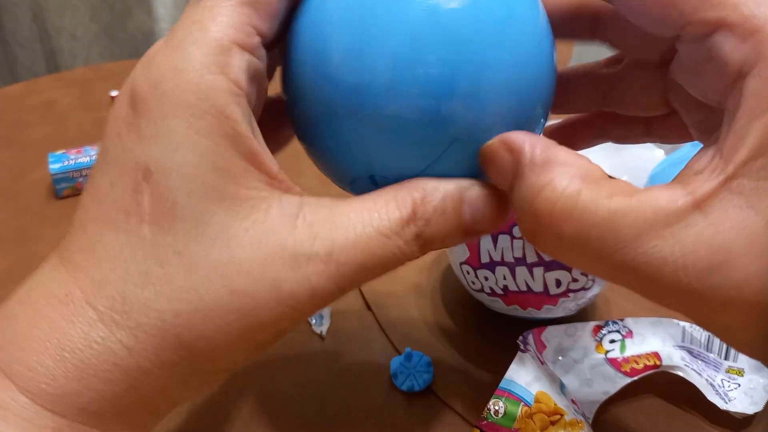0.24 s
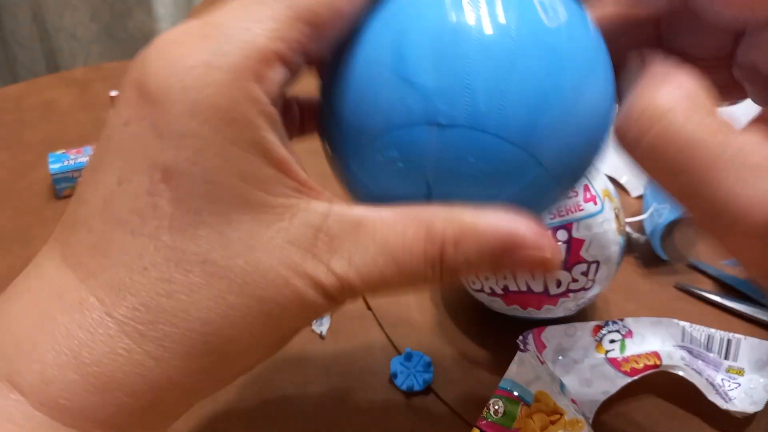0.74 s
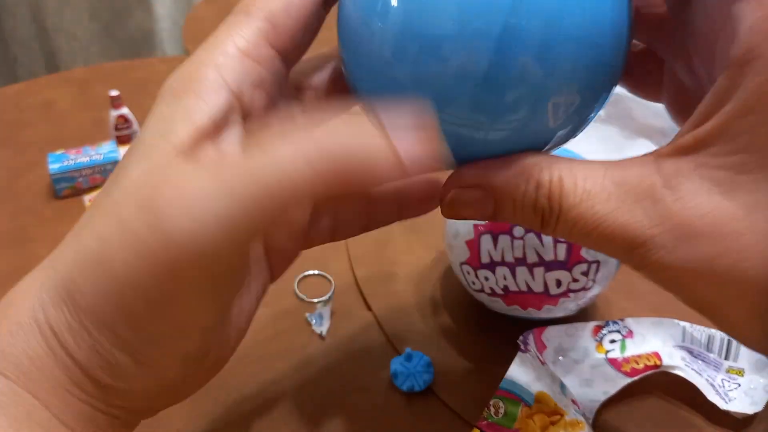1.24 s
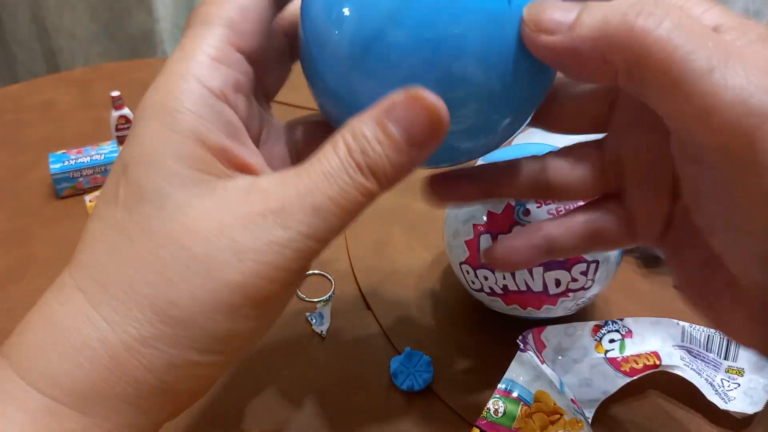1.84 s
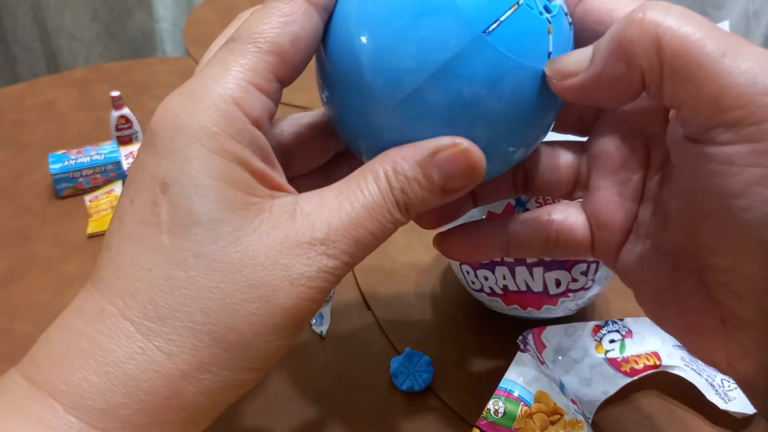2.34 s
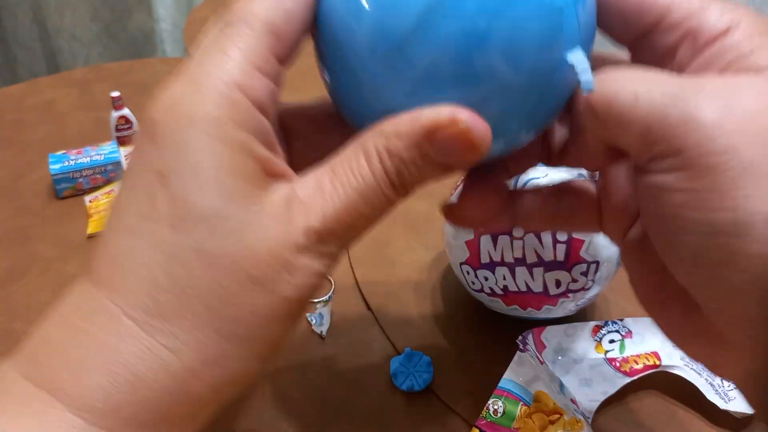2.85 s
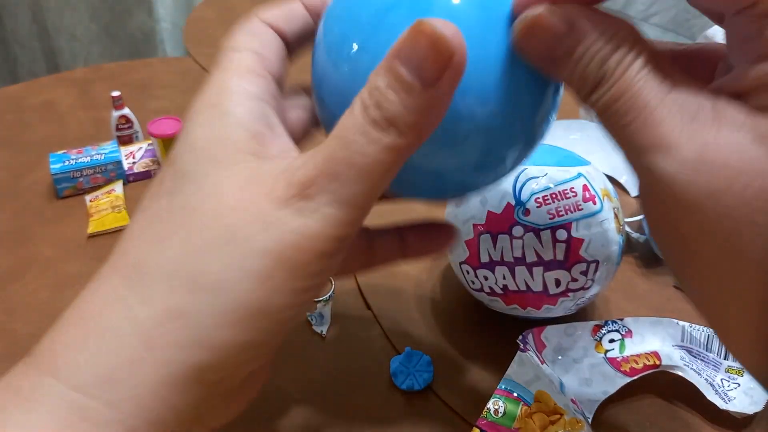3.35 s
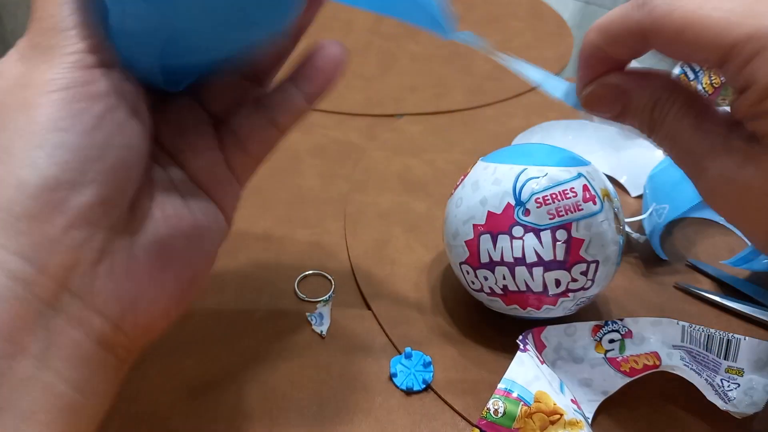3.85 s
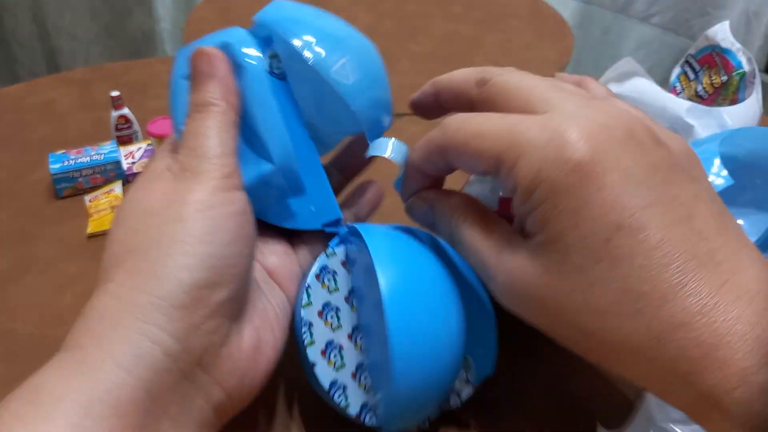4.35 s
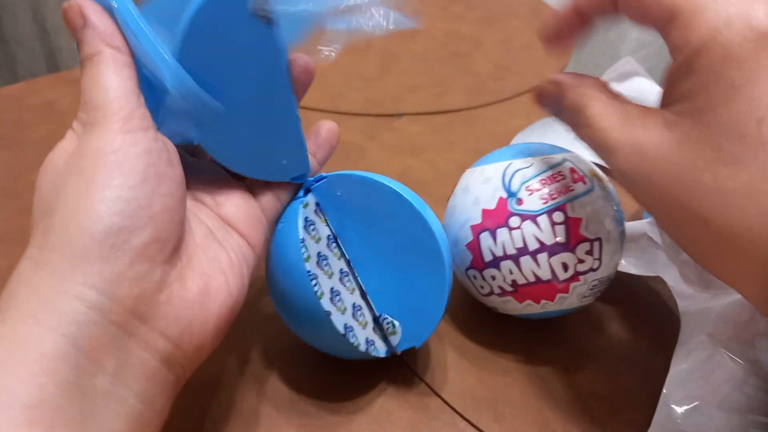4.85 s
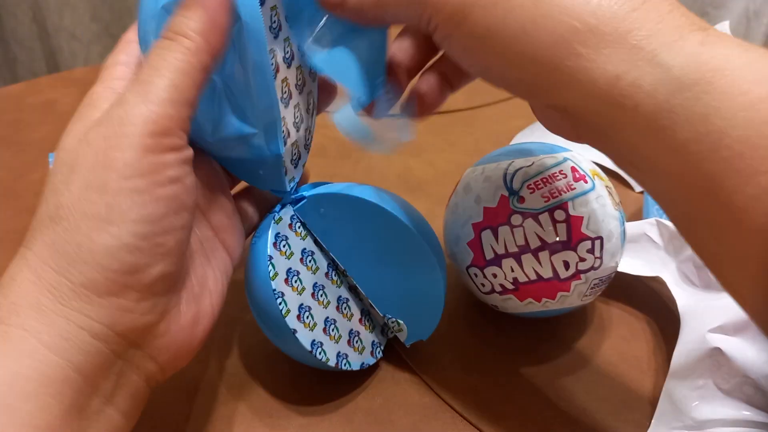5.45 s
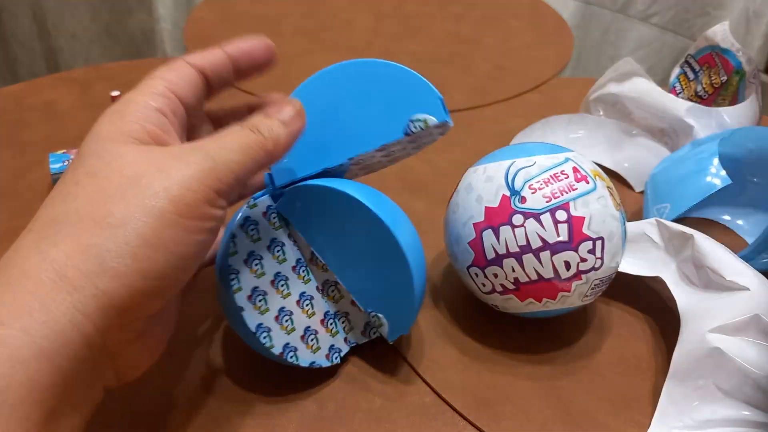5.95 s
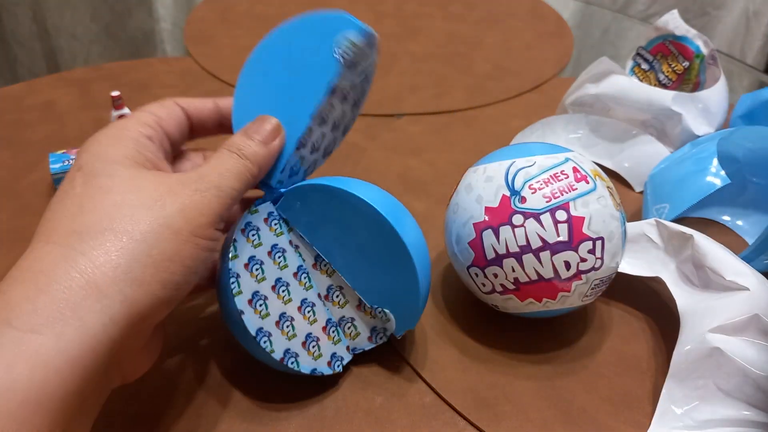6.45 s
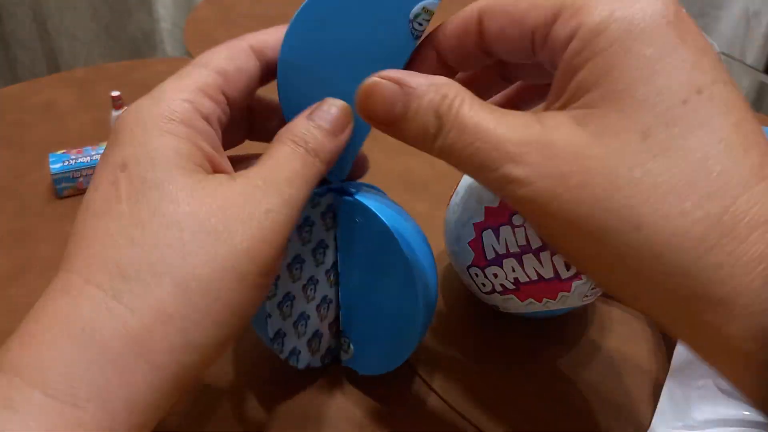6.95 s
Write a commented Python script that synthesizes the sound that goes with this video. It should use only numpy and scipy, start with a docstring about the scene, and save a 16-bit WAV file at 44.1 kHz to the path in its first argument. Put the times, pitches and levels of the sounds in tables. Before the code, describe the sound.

In a small room with a low appliance hum, hands close to two spaced microphones pick at a plastic capsule's tight film: sharp snaps, dull bumps and small rustles with pauses. A perforated strip rips quickly, its pitch sinking. Then hollow segments clatter apart in a dense burst, followed by rubbing, film crinkling and scattered light knocks.

```python
"""A small room, an appliance humming close by, hands near two spaced microphones: bass alike, treble unrelated.
First fingers pick at a plastic capsule's shrink film: noise-burst snaps, rustles and a few knocks.
From about 3.5 s the perforated strip tears: uneven cracks with a sinking band of noise, the hum low beneath.
Then the hollow segments fall open, knock (short decaying sines) and rub (resonant noise); the film crinkles
on the table to the end. The hum, steady sines with room air, follows a set level and dips briefly at set times."""
import sys
import numpy as np
from scipy import signal
from scipy.fft import rfft, irfft, next_fast_len
from scipy.io import wavfile
from scipy.ndimage import uniform_filter1d, map_coordinates

SR = 44100
rng = np.random.default_rng(int(sys.argv[2]) if len(sys.argv) > 2 else 0)


def waveform_to_disk(signal):
    """Save audio, clipped to [-1, 1], as 16-bit WAV at the path in sys.argv[1]."""
    frames = np.transpose(np.atleast_2d(signal))
    scaled = np.clip(frames, -1, 1) * 32767
    samples = np.round(scaled).astype(np.int16)
    wavfile.write(sys.argv[1], SR, samples)


def ratio(d):
    """dB to gain"""
    e = np.asarray(d, float) / 20
    return 10 ** e


N = 317961
CLOCK = np.arange(N) / SR  # time of each sample, s

# All levels are relative: each source adds its own trim. Spectra are shapes, in dB per Hz.
# snaps of film and plastic: start_s, level_db, top_octave_db (over the level), length_ms
SNAP_EVENTS = [(.142, -32.5, 2.5, 3.761), (.294, -32, -5, 5.16), (.325, -24, 0, 10.535),
               (.487, -13.5, -13, 2.883), (.542, -7.5, -15.5, 6.293), (.583, -25, -14, 3.94),
               (.668, -18.5, -13, 3.66), (0.68, -12, -7.5, 3.891), (.73, -3, -19, 3),
               (.761, -12.5, -19, 4.62), (.895, -31.5, -5.5, 5.095), (.921, -26, -4, 3.78),
               (0.951, -17, -32, 10.93), (.971, -20, -27.5, 3.38), (1.014, -6.5, -16.5, 6.354),
               (1.029, -10, -12.5, 2.357), (1.044, -26, -13, 3.68), (1.094, -32.5, -18, 5.51),
               (1.186, -33, -33, 4.655), (1.435, -37, 0, 3), (1.483, -18.5, -25.5, 8.31),
               (1.626, -34.5, -4, 5.44), (1.801, -25, -33, 4.924), (2.06, -31, -5, 2.417),
               (2.297, -9, -10, 3.717), (2.566, -7.5, -14.5, 5.575), (2.678, -24, -16.5, 4),
               (2.69, -30, -20, 4), (2.791, -27.5, -11, 4.737), (2.815, -34, -5, 4),
               (2.828, -19, -2.5, 9.603), (2.877, -21, -23, 3.67), (2.938, -20, -8.5, 4.4),
               (2.963, -21, -24.5, 5), (2.985, -23, -25.5, 3.2), (3.016, -19, -21, 3),
               (3.032, -11.5, -15, 3.599), (3.162, -32, -13.5, 7.916), (3.238, -23, -7.5, 6.73),
               (3.384, -30, -20, 6.247), (3.408, -26, -28, 3.9), (3.449, -15.5, -0.5, 2.816),
               (3.468, -12, -2, 2.75), (3.473, -17.5, 1, 3.598), (3.496, -14, -8, 3.62),
               (3.503, -10, -3.5, 2.636), (3.508, -14.5, -8, 5.543), (3.525, -11.5, -8, 4.12),
               (3.54, -13.5, -9.5, 7.07), (3.55, -15, -3, 5.14), (3.801, -15, 0.5, 2.599),
               (3.837, -18, -14.5, 9.244), (3.847, -7.5, -8.5, 2.881), (3.865, -16.5, -5.5, 3.76),
               (3.904, -16.5, -11.5, 5.81), (3.92, -10.5, -21.5, 4.342), (3.937, -16, -10.5, 5.14),
               (3.962, -9.5, -9, 4.319), (4.089, -19, -17.5, 7.83), (4.115, -15, -17.5, 4.933),
               (4.133, -12.5, -20, 9.35), (4.163, -14.5, -14.5, 5.72), (4.171, -11.5, -16, 2.774),
               (4.197, -10, -12, 7.848), (4.211, -11.5, -19, 3.493), (4.243, -19.5, -12, 5.54),
               (4.272, -23.5, -6, 2.976), (4.286, -19.5, -8, 4.155), (4.294, -17.5, -10, 6.08),
               (4.304, -15, -24.5, 9.13), (4.347, -12, -18, 5.558), (4.408, -20.5, -12, 7.154),
               (4.728, -32.5, -12, 4.556), (4.885, -22, -11, 5.7), (4.913, -22.5, -20.5, 5.964),
               (4.932, -20, -9, 4.06), (4.949, -13.5, -11, 3.666), (5.014, -24, -15, 6.32),
               (5.214, -27, -9, 5), (5.324, -27, -3, 5.3), (5.357, -19.5, -10.5, 6),
               (5.417, -20.5, -11.5, 3.967), (5.439, -14, -8.5, 4.31), (5.454, -13.5, -7.5, 7.265),
               (5.466, -18, -2.5, 9), (5.475, -18, -5.5, 5.313), (5.56, -11, -15.5, 10.53),
               (5.584, -15, -16, 3.94), (5.599, -13, -6, 5.11), (5.615, -12, -22, 5.207),
               (5.64, -18, -7.5, 5.954), (5.685, -20.5, -9.5, 5.626), (5.761, -13, -20, 5.483),
               (5.8617, -7, -10, 4.5), (6.111, -33.5, -10, 5.284), (6.159, -11, -25, 4),
               (6.437, -21.5, -25, 4.398), (6.594, -37.5, -3, 8), (6.702, -27, -11, 5.185),
               (6.743, -27.5, -10.5, 6.3), (6.794, -25.5, -13, 3.576), (6.879, -21, -15.5, 4.5),
               (7.008, -35, -6.5, 3.815)]
# body of a snap: freq_hz, density_db
SNAP_BODY_SPECTRUM = [(400, -29), (800, -17), (1500, -6), (3000, 2.5), (5000, 1.5), (7500, -2),
                      (10000, -13), (16000, -53.5)]
# top octave of a snap: freq_hz, density_db
SNAP_TOP_SPECTRUM = [(4000, -39.5), (7000, 4), (9000, 8.5), (13000, 9.5), (15800, 5), (15900, -23.5),
                     (17000, -33)]
# the strip tears hole by hole, the freed length sounds lower as it grows:
# time_s, rate_holes_per_s, level_db, strip_pitch_hz
TEAR_COURSE = [(3.556, 150, -17.5, 1300), (3.61, 120, -23, 1300), (3.648, 330, -25, 1220),
               (3.7, 275, -24, 900), (3.745, 290, -22.5, 500), (3.78, 400, -30, 300),
               (3.786, 400, -56.5, 300)]
# thin film under tension: freq_hz, density_db
TAUT_SPECTRUM = [(1500, -32.5), (2500, -11.5), (5000, -10.5), (7500, -3.5), (10000, -3.5), (14000, 1),
                 (15700, -5.5)]
# knocks on the hollow shell: start_s, level_db, shell_pitch_hz
KNOCK_EVENTS = [(.487, -23.5, 781.8), (.736, -17.5, 833.5), (.956, -20.5, 889), (0.97, -20.5, 738.5),
                (1.015, -15.5, 737.6), (1.029, -21, 650), (1.801, -30, 802.1), (2.297, -27, 750),
                (2.5645, -19, 1250), (2.879, -28, 900), (2.962, -27, 750), (3.847, -16, 2015),
                (3.896, -18.5, 1821), (3.915, -13, 1234), (3.95, -16, 932.9), (3.998, -24, 916.4),
                (4.074, -18, 1543), (4.105, -6.5, 1741), (4.116, -18, 1357), (4.133, -8.5, 968.9),
                (4.139, -6, 2068), (4.166, -12.5, 1704), (4.176, -6, 1749), (4.197, -10.5, 1129),
                (4.229, -16.5, 934.9), (4.237, -19.5, 828.8), (4.302, -7, 1062), (4.306, -7, 1062),
                (4.32, -8, 955.2), (4.349, -12.5, 896.7), (4.389, -14, 1006), (4.441, -23.5, 1063),
                (4.503, -22, 1007), (5.005, -23.5, 929.1), (5.352, -27, 1063), (5.44, -18, 1856),
                (5.456, -21, 1500), (5.562, -11.5, 1090), (5.583, -10, 1846), (5.615, -19, 1096),
                (5.651, -21, 2000), (5.706, -21, 1000), (5.72, -24, 950), (5.729, -19.5, 1025),
                (5.762, -3.5, 1010), (5.772, -17, 1050), (5.854, -22, 1103), (5.862, -19, 1400),
                (6.13, -25, 800), (6.16, -19, 1010), (6.189, -17, 741.3), (6.204, -20, 780),
                (6.219, -17, 747.9), (6.312, -22, 981.4), (6.4395, -13, 969.2), (6.441, -22, 2450),
                (6.53, -27, 1103), (6.599, -26, 1150), (6.704, -25, 900), (6.717, -23, 1200),
                (6.797, -23, 1010), (6.881, -16, 900), (6.91, -26, 1150), (7.009, -23.5, 987.9),
                (7.169, -18, 1007), (7.176, -18, 1000), (7.185, -14.5, 944.5)]
# modes of a knocked shell: multiple (of the pitch), level_db
KNOCK_MODES = [(1, 6), (.75, -3.5), (1.3, -6), (1.7, -7), (2.3, -4.5), (.5, -7.5)]
# soft bumps of palm and table: start_s, level_db, pitch_hz
BUMP_EVENTS = [(.586, -17, 330), (.7235, -12.5, 300), (0.7387, -12, 340), (.7744, -17, 320),
               (.959, -16, 330), (.975, -20, 330), (1.0175, -15, 330), (3.794, -24, 320),
               (3.803, -26, 95.33), (3.8395, -17, 423.8), (4.093, -20, 262.7), (4.3085, -20, 290),
               (4.9665, -22, 260), (5.373, -23, 350), (5.639, -26, 80), (5.764, -20, 287.6),
               (6.882, -16, 298.8)]
# rustles of the film: peak_s, level_db, rise_s and fall_s (per 20 dB), tautness_db (taut over slack)
RUSTLE_STROKES = [(0, -47, .01, .2, 10), (.15, -42, .07, .1, 4.5), (.333, -35, .06, .07, 7),
                  (.45, -46, .15, .15, 0.5), (.548, -39, .05, .1, 2.5), (.684, -34.5, .01, .25, 2),
                  (.738, -39, .05, .25, -15.5), (.9, -41, .07, .15, 2), (.956, -39.5, .03, .1, -4),
                  (1.02, -35.5, .015, .18, -5.5), (1.488, -42, .1, .11, -5.5), (2.06, -47, .15, .08, 1),
                  (2.303, -37.5, .01, .1455, 4), (2.572, -35, .008, .1046, 4.5),
                  (2.684, -45.5, .15, .08, -3), (2.833, -25, .008, .1024, 6), (2.89, -31, .07, .33, -1),
                  (3.243, -43, .016, .2, 4), (3.305, -44, .1, .08, 2), (3.453, -38, .01, .2, 8),
                  (3.505, -27.5, .0126, .2695, 9.5), (3.6, -27, .1, .1, 8), (3.667, -28, .1335, .2456, 4),
                  (3.79, -25, .1498, .04, 7.5), (3.87, -29, .1, .3, 0), (4.0, -36, .2, .2, -2.5),
                  (4.13, -32, .15, .2, -3), (4.24, -33, .2, .2, -2), (4.31, -33, .1, .1, -3),
                  (4.44, -38, .2, .06, -3), (4.84, -49, .2, .1, -5), (4.89, -32.5, .01, .059, -10),
                  (4.94, -32, .05, .17, -5), (5.18, -43, .1, .2, 5), (5.31, -43, .1, .15, 3),
                  (5.362, -36, .012, .12, 5), (5.468, -25, .05, .1349, 6), (5.565, -31, .0264, .1103, -4.5),
                  (5.63, -27, .0876, .13, -4), (5.767, -41, .01, .15, 0.5), (5.866, -28.5, .004, .19, -6),
                  (6.116, -47, .01, .15, -5.5), (6.168, -39.5, .03, .3, -0.5), (6.3, -46, .2, .3, 0),
                  (6.47, -47, .25, .2, 3), (6.715, -42, .013, .3, -3), (6.884, -44, .05, .06, 1.5),
                  (7.02, -46, .03, .2, 5), (7.16, -44, .05, .3, 4)]
# slack film: freq_hz, density_db
SLACK_SPECTRUM = [(900, -37), (1500, -21.5), (2200, -1), (4000, -2), (7000, -6.5), (10000, -10),
                  (15700, -27)]
# rubs on the shell: peak_s, level_db, rise_s and fall_s (per 20 dB), table_grumble_db (over the rub)
RUB_STROKES = [(.554, -43, .1676, .1311, -5), (.738, -34, .0912, .132, -2), (.963, -39.5, .0172, .1174, -2),
               (1.028, -36.5, .03, .17, -4), (2.86, -39, .03, .25, -9), (3.7, -37, .08, .3, -15),
               (3.85, -34, .05, .12, -8), (3.94, -30, .1, .15, -12), (4.04, -34, .15, .2, -12),
               (4.14, -24, .15, .15, -9), (4.21, -25, .2, .293, -7), (4.4, -32, .1715, .1, -8),
               (4.892, -33, .008, .1867, -5), (4.95, -29, .07, .1713, -2), (5.1, -41, .1, .35, -5),
               (5.22, -35, .015, .35, -2), (5.36, -30.5, .015, .17, -2), (5.45, -32, .0939, .2621, -8),
               (5.565, -30, .0379, .0814, -5), (5.617, -26, .0919, .18, -8),
               (5.72, -38.5, .1047, .0736, -5), (5.768, -38, .01, .3, -5), (6.121, -34, .02, .1964, -2),
               (6.19, -28, .0537, .2, -4), (6.37, -38, .1, .2, -5), (6.61, -44, .1, .3, -5),
               (6.72, -36, .03, .3, -5), (6.884, -37, .2, .15, -5), (7.019, -42, .05, .33, -5),
               (7.185, -27, .0472, .3, -5)]
# shell resonances under rubbing: center_hz, width_hz, level_db
SHELL_RESONANCES = [(454.39, 118.5, -6), (795.47, 132.5, -2), (1010, 220.8, -3.5), (1690.1, 376.87, -6.5),
                    (2300, 900, -17.5)]
# decay of the small room: freq_hz, t60_s
ROOM_DECAY = [(300, 0.5243), (2000, 0.2422), (8000, 0.222), (16000, 0.04317)]
# slow level of hum and room air: time_s, level_db
HUM_COURSE = [(0, -27), (1.2, -26.5), (2.8, -26), (2.95, -28.5), (3.54, -28), (3.6, -46.5), (3.97, -49.5),
              (4.08, -33), (4.4, -36.5), (5.0, -33.5), (5.34, -30), (5.65, -28.5), (5.78, -29),
              (5.9, -31.5), (6.16, -28), (7.21, -27)]
# brief dips of hum and room air: center_s, depth_db, half_width_s (to 1/e of the depth)
HUM_DIPS = [(.7, 9, 0.03647), (2.855, 17, 0.02389), (3.49, 9, 0.0399), (4.2, 7.5, 0.0806),
            (4.33, 19.5, 0.0278), (5.36, 10.5, 0.01107), (5.475, 13, 0.03987), (5.6, 17, 0.01159),
            (5.86, 4, 0.02516)]
# motor shaft orders: multiple (of the shaft rate), level_db (against the mains tone)
MOTOR_ORDERS = [(1, -28.5), (2, -13), (4, -16.5), (6, -20), (7, -30.5), (8, -19)]
# other appliance tones: freq_hz, level_db (against the mains tone)
APPLIANCE_TONES = [(91.2, -26), (169.9, -36), (519.8, -25)]
# room air: freq_hz, density_db
AIR_SPECTRUM = [(30, -41), (48, -29.5), (62, -16.5), (100, -6.5), (150, -8), (185, -14.5), (370, -14.5),
                (520, -20), (560, -25.5), (820, -29.5), (1200, -37.5), (3000, -42.5), (9000, -58),
                (12500, -53), (15700, -49)]
# likeness of the two spaced microphones: freq_hz, correlation (0 to 1)
MIC_LIKENESS = [(40, 0.4914), (130, 0.6564), (290, 0.8201), (640, 0.1608), (1400, 0), (3000, 0)]
# steep treble cutoff on the steadier sounds: freq_hz, gain_db
TREBLE_CUTOFF = [(15800, 0), (15900, -40)]


def unit(x):
    """Scaled to rms 1."""
    return x / np.sqrt(np.mean(x ** 2) + 1e-20)


def along(points, hz):
    """(Hz, value) points read on a log frequency axis."""
    f, v = np.transpose(points)
    return np.interp(np.log(hz + 1), np.log(f + 1), v)


def curves(rows):
    """One value per sample for each column after the time."""
    s, *cols = np.transpose(rows)
    return [np.interp(CLOCK, s, c) for c in cols]


def wobble(rate):
    """A smooth random curve, rate knots a second, knots of standard deviation 1."""
    knots = rng.standard_normal(int(N * rate / SR) + 4)
    return map_coordinates(knots, [np.arange(N) * rate / SR])


def filtered(x, response):
    """x through a complex response of frequency."""
    m = next_fast_len(N + 8192)
    return irfft(rfft(x, m) * response(np.fft.rfftfreq(m, 1 / SR)), m)[..., :N]


def colour(spectrum):
    """A gain response from (Hz, dB) points."""
    return lambda hz: ratio(along(spectrum, hz))


def noise(response):
    """Stereo noise of rms 1, as alike left and right as two spaced microphones make it."""
    def mid_side_response(hz):
        angle = np.arccos(np.clip(along(MIC_LIKENESS, hz), -1, 1)) / 2
        return response(hz) * [np.cos(angle), np.sin(angle)]

    mid, side = filtered(rng.standard_normal((2, N)), mid_side_response)
    return unit(np.array([mid + side, mid - side]))


def add(track, s, sound):
    """Lays a short sound into both channels at time s."""
    part = track[:, round(s * SR):][:, :sound.shape[-1]]
    part += sound[..., :part.shape[1]]


def burst(ms, rise_ms):
    """Envelope of a crack: quick rise, then a fall reaching -20 dB at ms."""
    t_ms = np.arange(SR // 25) / SR * 1000
    return (1 - np.exp(-t_ms / rise_ms)) * ratio(-20 * (t_ms / max(ms, 1)) ** 1.5)


def snaps():
    """Each snap is a few ms of noise; thin film puts more of it in the top octave."""
    body, top = np.zeros((2, N)), np.zeros((2, N))
    for s, db, top_db, ms in SNAP_EVENTS:
        balance = ratio(1.569 * rng.standard_normal((2, 1)))  # random level per microphone
        add(body, s - .0005, ratio(db - 1.5) * balance * burst(ms, rise_ms=0.55))
        add(top, s - .0005, ratio(db + top_db + 6.5) * balance * burst(1.0133 * ms, rise_ms=0.35))
    return body * noise(colour(SNAP_BODY_SPECTRUM)) + top * noise(colour(SNAP_TOP_SPECTRUM))


def tear():
    """Bridges between the holes break one by one at an uneven pace; the freed strip and its edge resonate."""
    rate, db, strip_hz = curves(TEAR_COURSE)
    start_s, end_s = TEAR_COURSE[0][0], TEAR_COURSE[-1][0]
    pace = rate * (CLOCK > start_s) * ratio(3 * wobble(150))
    breaks = np.diff(np.floor(np.cumsum(pace) / SR), prepend=0)  # a pulse at each whole hole
    breaks = breaks * ratio(db + 13.5 + 0.645 * wobble(220))
    cracks = signal.fftconvolve(breaks, burst(2.3968, rise_ms=1.0))[:N] * noise(colour(TAUT_SPECTRUM))
    freed = ratio(db) * np.clip((CLOCK - 3.642) / .012, 0, 1) * (CLOCK < end_s)  # strip free from 3.642 s
    strip = ratio(-17.5) * swish(strip_hz, width_hz=200)
    edge_hz = 2280 * ratio(.5 * wobble(20))  # the torn edge wavers in pitch
    edge = ratio(-19) * swish(edge_hz, width_hz=450)
    return freed * (strip + edge) + cracks


def swish(hz, width_hz):
    """Narrow noise of rms 1 around a moving frequency: slow noise turns a sine and a cosine."""
    a, b = filtered(rng.standard_normal((2, N)), lambda f: 1 / (1 + (2 * f / width_hz) ** 2))
    phase = 2 * np.pi * np.cumsum(hz) / SR
    return unit(a * np.cos(phase) + b * np.sin(phase))


def knocks():
    """Each contact swells for a ms or two as it flattens, ringing shell modes; then it chatters on other spots."""
    contact_ms, knock_cycles = 3.3162, 2.18  # these two make the time in which a knock falls 17 dB
    chatter_ms, chatter_db = 5, -9.5  # loose halves touch again: mean gap, level step per contact
    out, t = np.zeros((2, N)), np.arange(SR // 40) / SR
    late = t - 0.00011 * np.arange(2)[:, None]  # s: the right microphone is farther, hears each mode late
    multiples, levels_db = np.transpose(KNOCK_MODES)
    count = len(multiples)
    # as many small modes again, scattered around 1.2 times the pitch
    centers = np.append(multiples, np.full(count, 1.2))[:, None, None]
    spread_octaves = np.repeat([.1, .55], count)[:, None, None]
    mode_db = np.append(levels_db, np.full(count, -7))[:, None, None]
    for s, db, hz in KNOCK_EVENTS:
        life = 1000 * t / (contact_ms + 1000 * knock_cycles / hz)
        swell = (1 - np.exp(-(life / 0.31) ** 2)) * ratio(-17 * life)
        gaps, sizes = rng.random((2, 3))
        delays = np.append(0, np.cumsum((.5 + gaps) * chatter_ms / 1000))
        gains = np.append(1, ratio(chatter_db * np.arange(1, 4)) * (.5 + sizes))
        for delay, gain in zip(delays, gains):
            strength, shift, phase = rng.standard_normal((3, 2 * count, 1, 1))
            mode_hz = hz * centers * 2 ** (shift * spread_octaves)
            modes = ratio(mode_db + 2.3 * strength) * np.sin(2 * np.pi * mode_hz * late + 2 * phase)
            ring = np.sum(modes, axis=0)
            add(out, s - .001 + delay, gain * ratio(db - 1.5) * ratio([[1.1], [-1.1]]) * swell * ring)
    return out


def bumps():
    """A soft bump of palm or table is one dull swing, a sine falling 60 dB in 4.5 cycles."""
    out, t = np.zeros((2, N)), np.arange(SR // 12) / SR
    for s, db, hz in BUMP_EVENTS:
        fall = ratio(db + 6 - 60 * t * hz / 4.5)
        add(out, s - .002, fall * np.sin(2 * np.pi * hz * t) * (1 - np.exp(-t / 0.0008)))
    return out


def sliding():
    """Skin hisses on film, brighter when taut; on the shell it drives resonances in slips, the table grumbling."""
    grip_film_db, grip_rub_db = -80, -63  # faint skin contact between the strokes
    crinkle = crackle(230, share=1.5, ms=2.3)
    slips = crackle(300, share=1.1, ms=3.5)
    taut = 1 / (1 + ratio(-2 * np.transpose(RUSTLE_STROKES)[4]))  # share of the power
    film = strokes(RUSTLE_STROKES, taut, grip_film_db) * noise(colour(TAUT_SPECTRUM))
    film = film + strokes(RUSTLE_STROKES, 1 - taut, grip_film_db) * noise(colour(SLACK_SPECTRUM))
    film = ratio(1.4276 * wobble(33)) * crinkle * film
    rub = strokes(RUB_STROKES, np.ones(len(RUB_STROKES)), grip_rub_db) * slips * shell()
    grumble = noise(colour([(120, -36.5), (220, 1.0), (420, -1), (700, -28.5)]))
    table = strokes(RUB_STROKES, ratio(2 * np.transpose(RUB_STROKES)[4]), -70) * grumble
    return film + ratio(2.3 * wobble(40)) * (rub + table)


def crackle(rate, share, ms):
    """A gain of rms 1 made of dense small cracks (rate per second, on average) over a steady part."""
    cracks = (rng.random(N) < rate / SR) * ratio(4 * rng.standard_normal(N))
    return unit(1 + share * signal.oaconvolve(cracks, burst(ms, 0.2766))[:N])


def strokes(rows, shares, rest_db):
    """Gain of strokes that rise and fall evenly in dB; their powers add, each weighted by its share."""
    peak_s, db, rise, fall = np.transpose(rows)[:4, :, None]
    grid_s = np.arange(0, N / SR + .01, .001)
    before = (peak_s - grid_s) / np.clip(rise, .003, .35)
    after = (grid_s - peak_s) / np.clip(fall, .003, .35)
    power = shares @ ratio(2 * (db - 20 * np.maximum(before, after)))
    return np.interp(CLOCK, grid_s, np.sqrt(power + ratio(2 * rest_db)))


def shell():
    """Noise in the shell's resonances; each one swells and fades on its own as the grip shifts."""
    def resonance(center, width):
        return lambda f: 1j * f * width / (center * center - f * f + 1j * f * width)

    return unit(sum(ratio(db + 3 * wobble(30)) * np.sqrt(width) * noise(resonance(center, width))
                    for center, width, db in SHELL_RESONANCES))


def patchy(x, depth_db):
    """Resonances of flexing plastic come and go: random gain patches a few hundred Hz wide."""
    z = signal.stft(x, nperseg=512)[2]
    field = uniform_filter1d(rng.standard_normal(z.shape[1:]), size=4, axis=0)  # over frequency
    field = uniform_filter1d(field, size=9, axis=1)  # over time
    return signal.istft(z * ratio(depth_db * unit(field)), nperseg=512)[1][:, :N]


def room(x):
    """The walls answer after a few ms with decaying noise; each frequency dies at its own speed."""
    hz, t, z = signal.stft(rng.standard_normal((2, SR // 2)), SR, nperseg=256)
    decay = ratio(-60 * t / along(ROOM_DECAY, hz)[:, None])
    tail = signal.istft(z * decay, SR, nperseg=256)[1]
    tail = tail * (1 - np.exp(-(np.arange(tail.shape[1]) / SR / 0.001575) ** 2))
    return signal.fftconvolve(x, tail / np.linalg.norm(tail[0]), axes=1)[:, :N]


def ambience():
    """Mains tone, motor orders and other tones are steady sines that rise and sink together with room air."""
    mains_hz, shaft_hz = 119.97, 59.08
    lines = [(mains_hz, 0)] + [(k * shaft_hz, db) for k, db in MOTOR_ORDERS] + APPLIANCE_TONES
    hum = sum(ratio(db) * np.sin(2 * np.pi * (hz * CLOCK + rng.random())) for hz, db in lines)
    hum = hum * np.sqrt(2)  # mains tone at rms 1
    air = ratio(-7.5 + 0.3105 * wobble(14)) * noise(colour(AIR_SPECTRUM))
    dips_db = sum(db * np.exp(-((CLOCK - s) / half) ** 2) for s, db, half in HUM_DIPS)
    return ratio(curves(HUM_COURSE)[0] - dips_db) * (hum * ratio([[.9], [-.9]]) + air)


def scene():
    """Handling near the microphones, room tail and hum; direct snaps, knocks and bumps skip the treble cutoff."""
    lean = ratio([[0.1175], [-0.1175]])  # dB: the hands work a little nearer the left microphone
    cracks = lean * snaps()
    blows = filtered(knocks() + bumps(), lambda hz: 1 / (1 + (55 / (hz + 1)) ** 4))  # bass cut near 55 Hz
    handling = patchy(lean * (tear() + sliding()), depth_db=2.5)
    tail = room(ratio(-14) * (cracks + blows))
    return cracks + blows + filtered(handling + tail + ambience(), colour(TREBLE_CUTOFF))


def roll_off(x):
    """The treble ends steeply here."""
    return signal.sosfilt(signal.butter(12, 16990, fs=SR, output="sos"), x)


def record(dry):
    """Soft clipping rounds the highest peaks of the two microphone channels."""
    mix = dry / (1 + np.abs(dry) ** 6) ** (1 / 6)
    return roll_off(mix)


dry = scene()
out = record(dry)
waveform_to_disk(out)
```